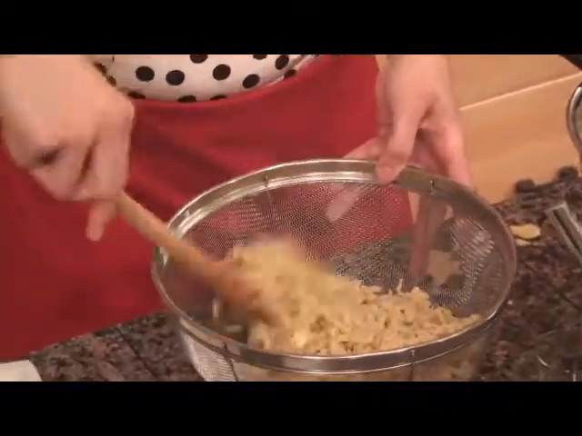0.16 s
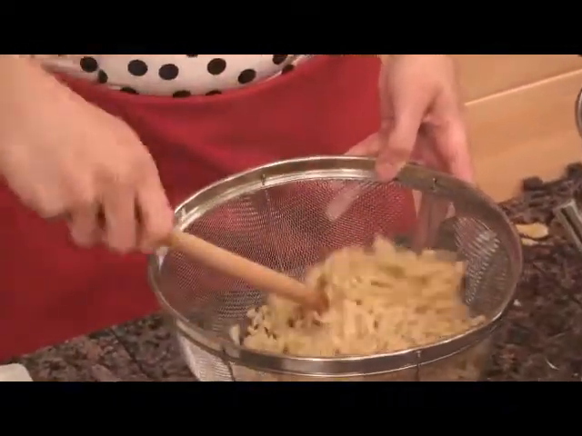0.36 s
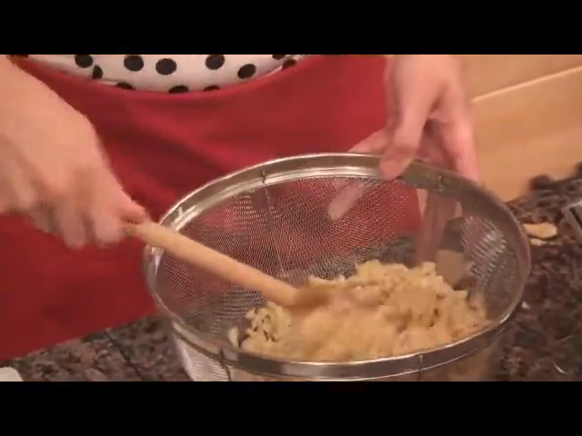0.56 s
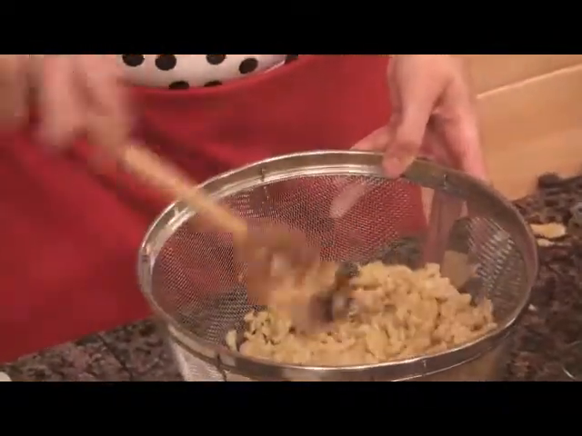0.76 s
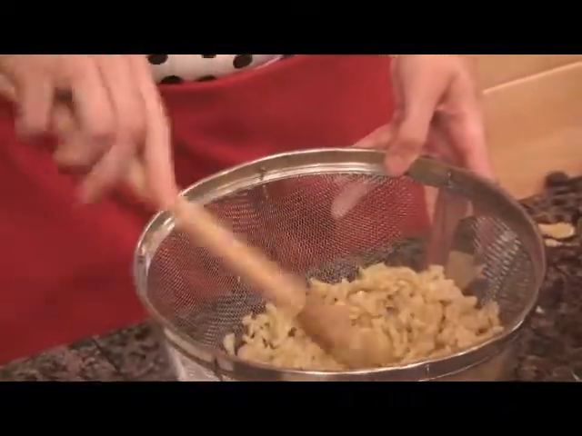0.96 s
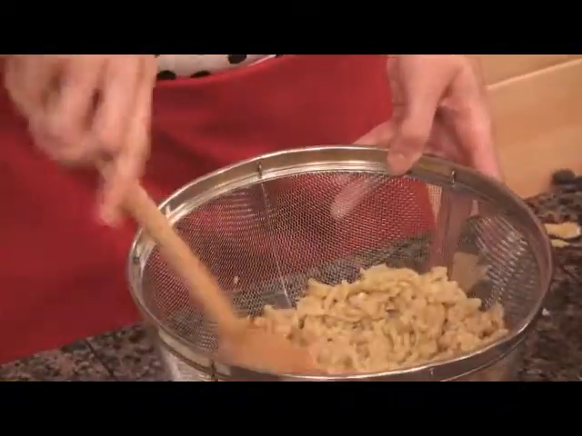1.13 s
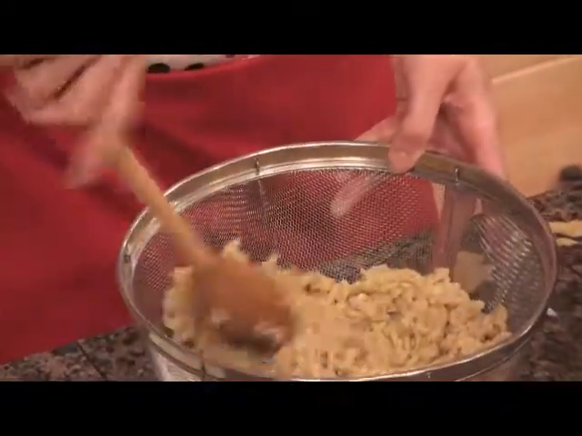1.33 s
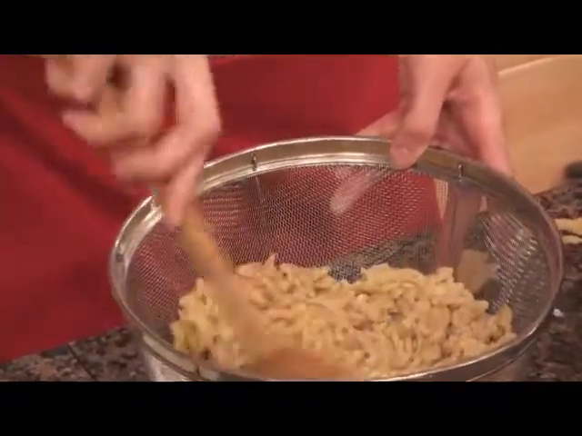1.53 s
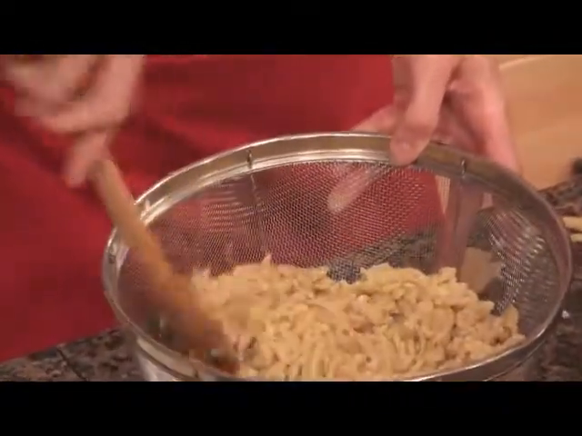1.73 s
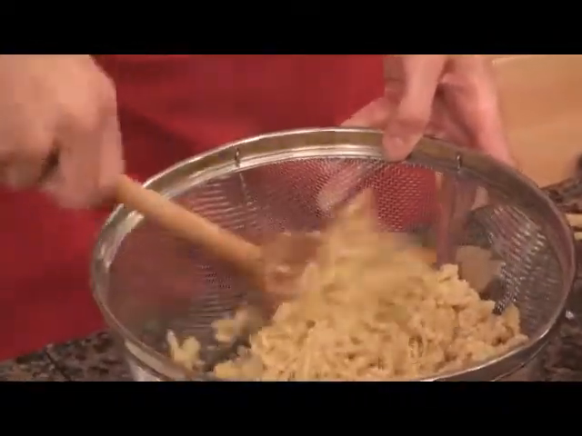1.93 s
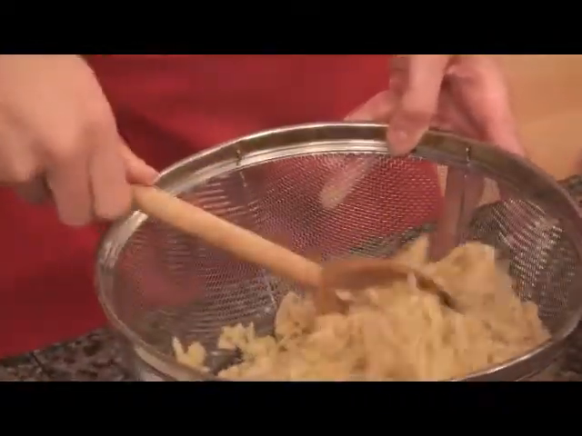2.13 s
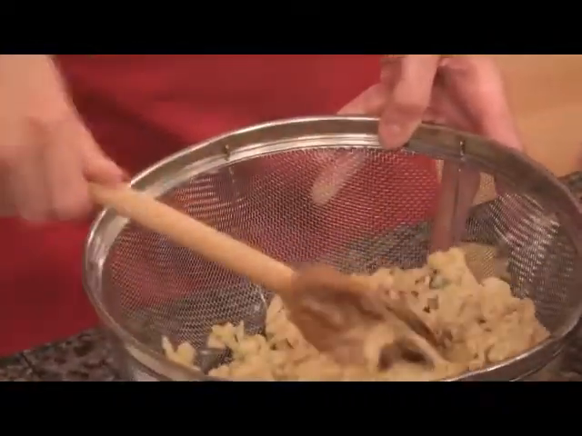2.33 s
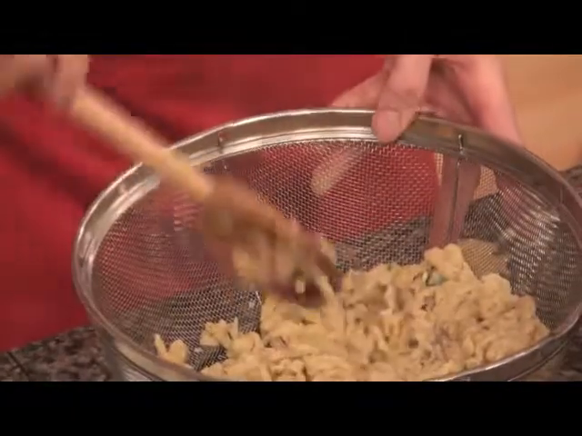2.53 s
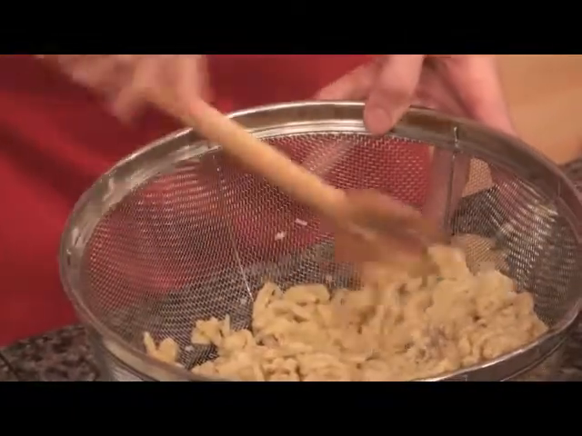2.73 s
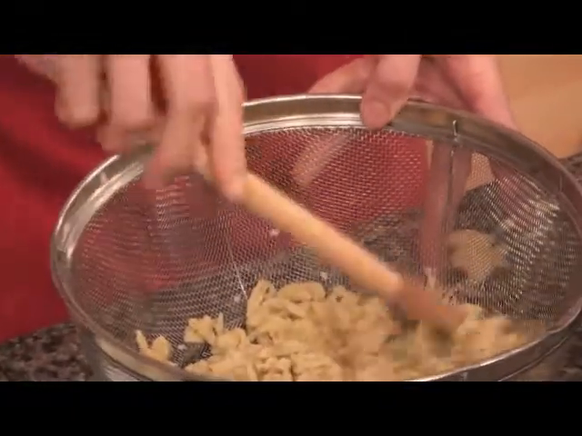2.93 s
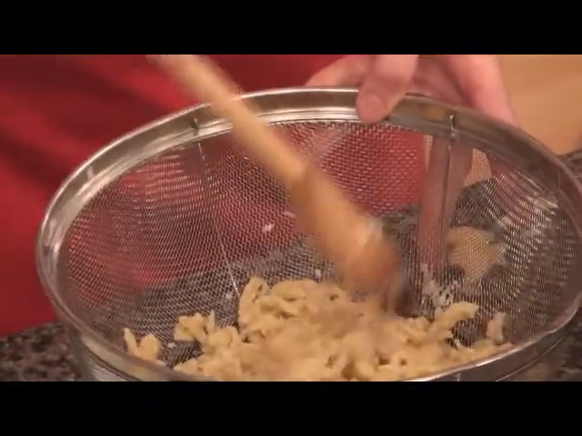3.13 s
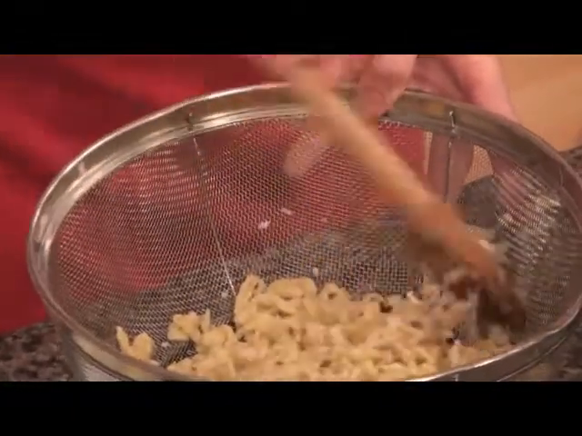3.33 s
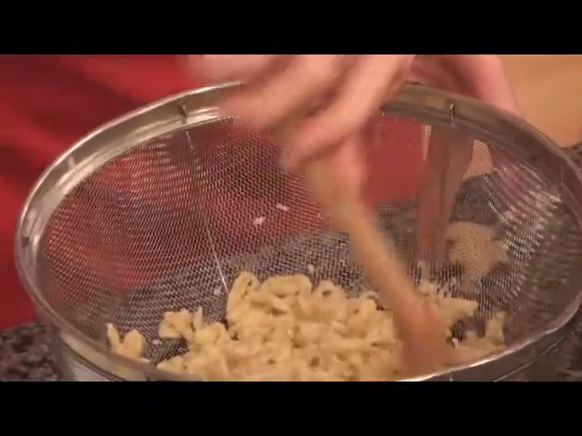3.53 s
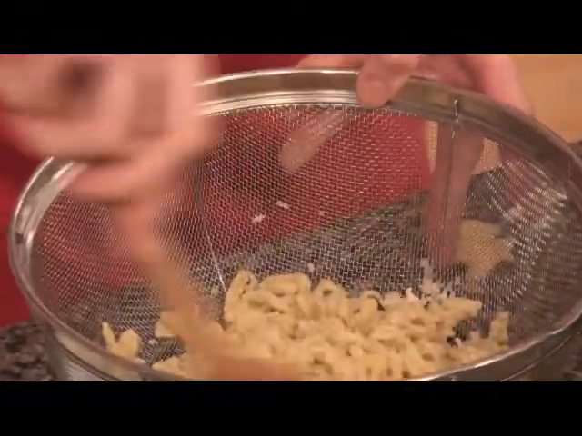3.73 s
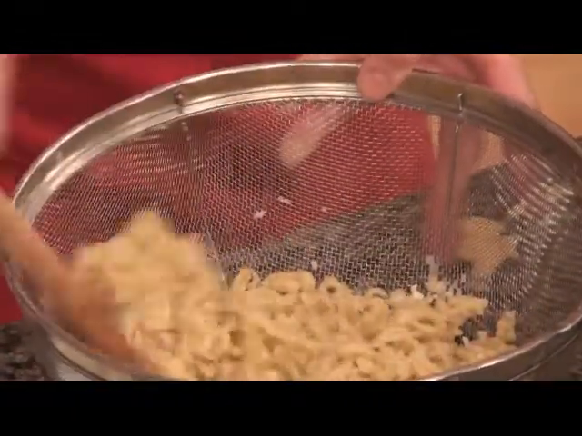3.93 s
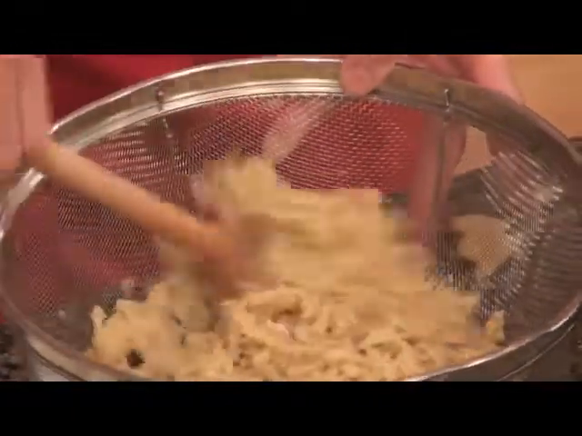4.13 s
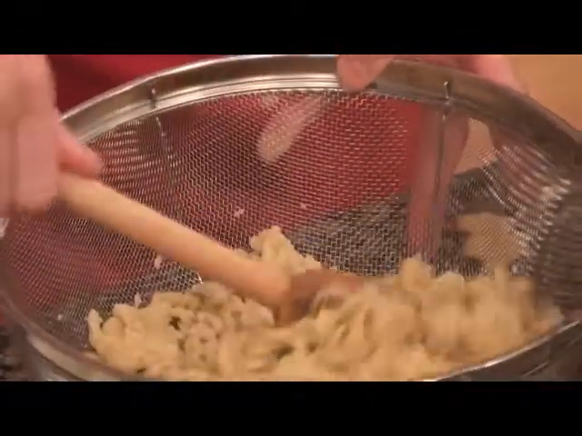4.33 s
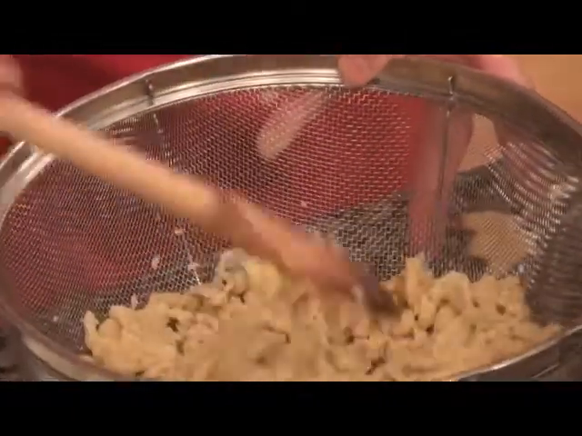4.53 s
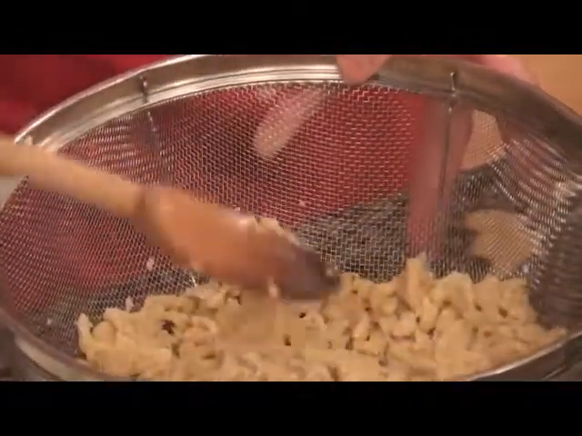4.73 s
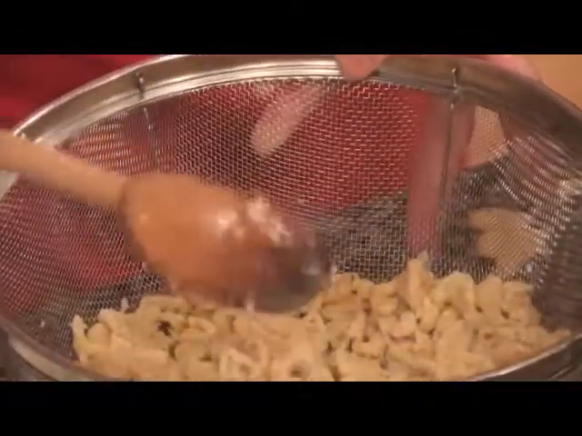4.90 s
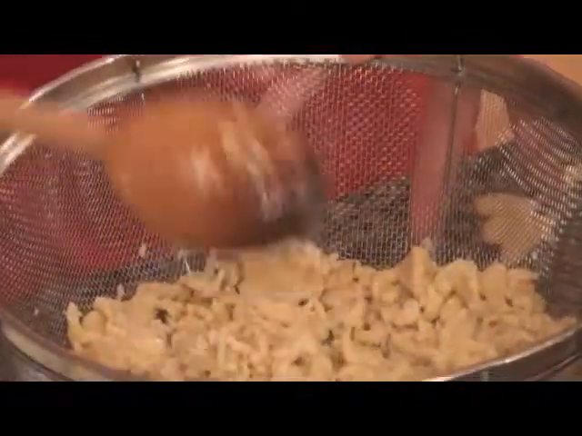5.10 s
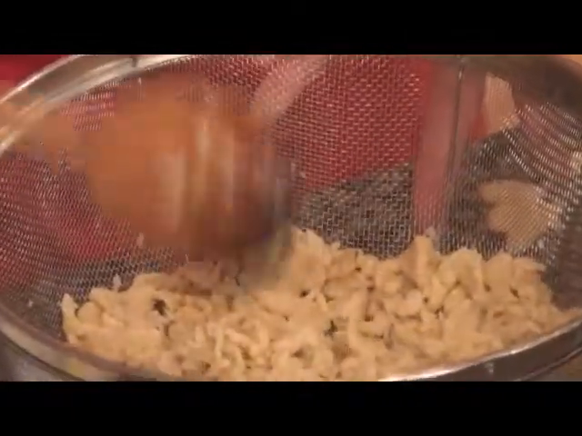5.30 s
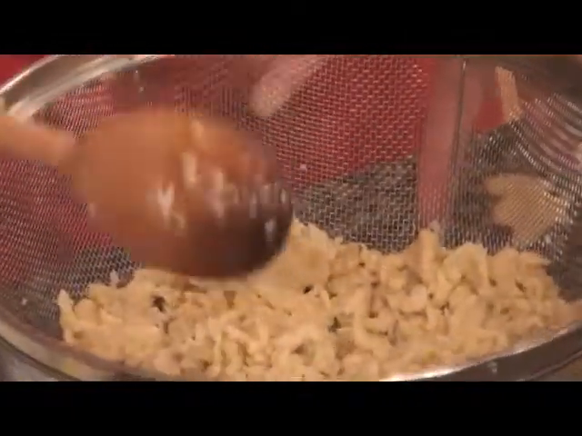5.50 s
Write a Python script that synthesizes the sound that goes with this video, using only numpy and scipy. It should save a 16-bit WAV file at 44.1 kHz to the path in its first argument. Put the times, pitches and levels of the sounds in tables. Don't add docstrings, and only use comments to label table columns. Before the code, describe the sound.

Close up in a hard-walled kitchen, a wooden spoon drags cooked noodles over a steel mesh strainer in short raspy bursts with bright ticks and soft food landings. Six spaced raps on the rim finish it. Faint fridge hum and very low paired thuds lie beneath; nearly mono.

```python
import sys
import numpy as np
from scipy import signal
from scipy.fft import rfft, irfft, next_fast_len
from scipy.io import wavfile
from scipy.ndimage import map_coordinates

SR = 44100
rng = np.random.default_rng(int(sys.argv[2]) if len(sys.argv) > 2 else 0)


def transcribe(signal):
    frames = np.atleast_2d(signal).T
    limited = np.clip(frames, -1, 1)
    pcm = np.round(limited * 32767).astype(np.int16)
    wavfile.write(sys.argv[1], SR, pcm)


def volts_from_db(level):
    exponent = np.asarray(level, float) / 20
    return 10 ** exponent


N = 249492


def unit(x):
    return x / np.sqrt(np.mean(x ** 2) + 1e-20)


def along(points, hz):
    f, v = np.transpose(points)
    return np.interp(np.log(hz + 1), np.log(f + 1), v)


def wobble(rate):
    knots = rng.standard_normal(int(N * rate / SR) + 4)
    return map_coordinates(knots, [np.arange(N) * rate / SR])


def filtered(x, response):
    m = next_fast_len(N + SR // 2)
    return irfft(rfft(x, m) * response(np.fft.rfftfreq(m, 1 / SR)), m)[..., :N]


def shaped_noise(spectrum):
    return unit(filtered(rng.standard_normal(N), lambda f: volts_from_db(along(spectrum, f)) * (f > 12)))


def body(modes):
    def response(f):
        total = 0
        for k, (centre, width, db) in enumerate(modes):
            damping = 1j * f * width
            total = total + (-1) ** k * volts_from_db(db) * damping / (centre ** 2 - f ** 2 + damping)
        return total
    return response


def struck(modes):
    def response(f):
        total = 0
        for k, (centre, width, db) in enumerate(modes):
            total = total - (-1) ** k * volts_from_db(db) * body([(centre, width, 0)])(f) ** 2
        return total
    return response


def peak(hz, q, x):
    return signal.lfilter(*signal.iirpeak(hz, q, SR), x)


# pitch_hz, density_db
AIR_TONE = [(20, -11), (60, -15), (110, -14), (200, -12), (400, -16), (700, -18.5), (1000, -22.5),
            (1500, -33), (1950, -20), (2400, -35.5), (4000, -35.5), (8000, -39.5), (12000, -41.5),
            (16000, -45)]


def kitchen_air():
    return volts_from_db(-46.5 + 0.8 * wobble(4)) * shaped_noise(AIR_TONE)


# pitch_hz, level_db, flutter_db
MOTOR_HUM = [(58.4, -56.5, 3), (120.7, -65, 3.5), (180.5, -63, 5), (240.3, -42, 1.5), (300, -50.5, 3),
             (381, -61, 3.5), (666, -61.5, 2.5)]


def fridge():
    t = np.arange(N) / SR
    hum = np.zeros(N)
    for hz, db, flutter_db in MOTOR_HUM:
        level = volts_from_db(db + 0.5 + flutter_db * wobble(25))
        phase = 0.086 * wobble(27) + 6 * rng.random()
        hum += level * np.sin(2 * np.pi * hz * t + phase)
    return hum


# start_s, level_db, pitch_hz, rise_s
PUSH_PAIR = [
    (.004, -39, 88, .017),
    (.278, -39.5, 60, .023),
]
# start_s, level_db, pitch_hz, rise_s
EXTRA_PUSH = (1, -47, 101, -3)


def thuds():
    beat_s, scatter_db = 0.632, 0.8
    out, t = np.zeros(N + SR), np.arange(SR // 6) / SR
    pushes = [(s + k * beat_s, *rest) for k in range(9) for s, *rest in PUSH_PAIR]
    for s, db, start_hz, rise_s in [*pushes, EXTRA_PUSH]:
        pitch_hz = 30 + (1.7 * start_hz - 30) * np.exp(-t / 0.02)
        swell = (t / rise_s) ** 2 * np.exp(2 - 2 * t / rise_s)
        level = volts_from_db(db + scatter_db * rng.standard_normal())
        push = level * swell * np.sin(2 * np.pi * np.cumsum(pitch_hz) / SR)
        out[round(s * SR):][:len(t)] += push
    return out[:N]


# delay_s, level_db
NEAR_ECHOES = [(.0032, -20), (.0065, -17), (0.0094, -30), (0.016, -12.5), (0.029, -13.5)]
# pitch_hz, t60_s
REVERB_TIME = [(200, 1), (530, 0.68), (1400, 0.7), (3700, 0.68), (9700, 0.53), (15000, 0.74)]


def room(x, delay_s=0.005):
    out, hop = np.zeros(N + 2 * SR), SR // 3
    for start in range(0, N, hop):
        hz, t, z = signal.stft(rng.standard_normal(SR * 3 // 4), SR, nperseg=256)
        decay = volts_from_db(-60 * t / along(REVERB_TIME, hz)[:, None])
        tail = signal.istft(z * decay, SR, nperseg=256)[1]
        tail = tail * np.clip(np.arange(len(tail)) / (delay_s * SR), 0, 1) ** 2
        answer = volts_from_db(0.5) * tail / np.linalg.norm(tail)
        for s, db in NEAR_ECHOES:
            answer[round(s * SR)] += volts_from_db(db)
        wet = signal.fftconvolve(x[start:start + hop], answer)
        out[start:start + len(wet)] += wet
    return out[:N]


# start_s, level_db, pitch_hz, t60_s
SHAKEN_MODES = [(.19, -41, 370, 0.22), (.41, -38, 2240, 0.33), (1.199, -36, 1300, 0.33),
                (1.17, -43.5, 2930, .6), (1.28, -38.5, 2900, 0.49), (.08, -40, 5500, 0.36),
                (.27, -41, 5600, 0.27), (1.33, -37.5, 370, 0.17), (1.8, -33, 668, 0.66),
                (1.8, -35, 370, 0.24), (2.054, -35.5, 353, 0.36), (2.901, -33, 290, 0.18),
                (3.53, -38, 930, 0.23)]


def landings():
    out, t = np.zeros(N + SR), np.arange(SR // 2) / SR
    for s, db, hz, t60 in SHAKEN_MODES:
        shake = unit(peak(hz, 9, rng.standard_normal(len(t))))
        envelope = volts_from_db(db - 60 * t / t60) * (1 - np.exp(-t / 0.0063))
        out[round(s * SR):][:len(t)] += envelope * shake
    return out[:N]


# start_s, level_db, pitch_hz, knock_db
GRITTY_CONTACTS = [(0.0375, -31, 2020, -3), (0.0954, -22, 5440, -8), (0.1386, -31, 2100, -1),
                   (0.288, -21, 2580, -13), (0.431, -23, 1920, -27), (1.105, -35, 1840, 1),
                   (1.132, -33, 3500, 1.5), (1.2124, -37, 2200, -9), (1.3417, -23.5, 2930, -4),
                   (1.714, -27.5, 2910, -7), (1.7597, -19.5, 6170, -3), (1.7837, -9.5, 3600, -12),
                   (1.7966, -15.5, 5950, -22), (1.963, -16.5, 1940, -27.5), (2.014, -18, 2430, -16),
                   (2.049, -20, 2064, -13), (2.761, -28.5, 1890, -5), (2.814, -40, 2610, -8),
                   (2.894, -22, 2080, -10), (3.502, -18.5, 4330, -7), (3.5287, -12, 2830, -12.5),
                   (3.7239, -29, 2900, -9), (3.891, -23, 5000, -7), (3.903, -16.5, 3840, -24),
                   (4.03, -24, 4300, -15), (4.196, -17.5, 2060, -13)]
# start_s,
# level_db, pitch_hz, knock_db
SHARP_SNAPS = [(0.079, -23, 5540, -17), (0.19, -21.5, 2680, -4), (0.216, -24, 2850, -2),
               (0.2735, -15, 2600, -12), (0.53, -29, 2510, -13), (1.4464, -39.5, 2770, -11),
               (1.5197, -33, 2750, -16), (2.132, -10.5, 4140, -21), (3.0674, -21, 4400, -13),
               (3.426, -23, 4280, -7), (3.7956, -27, 3230, -24), (3.835, -20, 2620, -13),
               (3.9526, -18, 2690, -13), (3.9727, -12.5, 2980, -14), (4.1728, -12, 2650, -11),
               (4.311, -22.5, 3600, -2.5), (0.687, -44, 8000, -20), (2.342, -35, 7000, -16),
               (3.305, -42, 6500, -25), (4.47, -31.5, 4500, -20), (4.54, -37, 7000, -18),
               (4.575, -34, 3440, -20)]


def ticks():
    out, t = np.zeros(N + SR), np.arange(SR // 12) / SR
    for contacts, swell_s in [(GRITTY_CONTACTS, 0.0028), (SHARP_SNAPS, 0.0011)]:
        swell = t / swell_s * np.exp(1 - t / swell_s)
        for s, db, hz, knock_db in contacts:
            mesh_grit, spoon_grit = rng.standard_normal((2, len(t))) * swell
            ring = 2.3 * peak(hz, 2.2, mesh_grit)
            sizzle = 0.48 * peak(7500, 0.9, mesh_grit)
            knock = volts_from_db(knock_db + 16) * peak(1100, 1.5, spoon_grit)
            out[round(s * SR):][:len(t)] += volts_from_db(db - 13.0) * (ring + sizzle + knock)
    return out[:N]


def chatter(rate, spread_db, smooth):
    size_db = spread_db * np.minimum(rng.exponential(size=N), 3.5)
    clicks = (rng.random(N) < rate / SR) * volts_from_db(size_db) * rng.choice([-1, 1], N)
    return unit(clicks) + smooth * rng.standard_normal(N)


# pitch_hz, width_hz, level_db
SPOON_BELLY = [(1052, 120, -1.5), (1300, 370, -1), (1640, 360, -0.5)]
# pitch_hz, width_hz, level_db
SPOON_LIP = [(2080, 330, -2.5), (2620, 200, -3), (2900, 330, -4)]
# pitch_hz, width_hz, level_db
STRAINER_BOWL = [(370, 119, 5), (668, 69, 2), (832, 680, 0)]
# pitch_hz, width_hz, level_db
MESH_WIRES = [(3890, 960, 9), (6080, 750, 8.5), (6870, 2500, 3.5)]
# pitch_hz, width_hz, level_db
WIRE_FIZZ = [(8800, 1700, 7), (11930, 5100, 5.5), (13600, 5400, 4.5)]
# start_s, hold_s, rasp_db, brightness_db, lip_over_belly_db
SPOON_DRAGS = [(0.0, 0.1, -39.5, 2.5, 1.5), (0.143, .06, -35, 0.6, 1.5), (0.283, 0.02, -36, 3, 1.5),
               (0.407, .015, -35.5, -0.5, 0.5), (1.134, .04, -41.5, -2, -3), (1.2, 0.076, -37, -2.5, 0),
               (1.273, 0.029, -34.5, 0.7, 1), (1.746, .015, -35, 3.5, 0), (1.774, 0.015, -27, 5, -.6),
               (1.88, 0.085, -38, 2, 1.5), (1.997, 0.046, -38, 4.5, -4), (2.051, 0.014, -37, 4, -1),
               (2.143, 0.047, -41.5, 6.5, 3.5), (2.813, .02, -37.5, 2, -1), (2.915, 0.026, -38, 1.5, -0.5),
               (3.506, 0.057, -41.5, 8, 3), (3.61, 0.1, -41, -2, 1.5), (3.721, .03, -40.5, 5.5, -.6),
               (3.77, 0.089, -40.5, 2.1, 2.2), (3.896, .02, -37, -2.5, 1.8), (3.96, 0.053, -39, 0, 2.5),
               (4.022, 0.049, -40.5, 4.5, 2.2), (4.176, 0.03, -35.5, 2.5, 1.5),
               (4.254, 0.075, -41.5, 4, 0.5)]
LIFT_FADE = [169, 146, 132, 171, 190]
PART_LEVEL = [-2.5, -3, -6.5, -5, -16.5]
CREEP_LEVEL = [-58, -60, -58, -66, -68]


def strokes():
    press_db_per_s, settled_s = 694, 4.8
    tumble_db, tumble_db_per_s = -11.5, 63
    clump_db = 2.4
    start, hold, rasp_db, bright_db, lip_db = np.transpose(SPOON_DRAGS)[:, :, None]
    t = np.arange(N) / SR
    early, late = np.maximum(start - t, 0), np.maximum(t - start - hold, 0)
    bumps = volts_from_db(1.6 * wobble(30) + 1.6 * wobble(90))
    colours = [-lip_db, lip_db, 0.35 * bright_db, bright_db, 1.73 * bright_db]
    out = 0
    for k, modes in enumerate([SPOON_BELLY, SPOON_LIP, STRAINER_BOWL, MESH_WIRES, WIRE_FIZZ]):
        fade_db = np.maximum(-LIFT_FADE[k] * late, tumble_db - tumble_db_per_s * late)
        peak_db = rasp_db + colours[k] + PART_LEVEL[k]
        drag_db = (peak_db - press_db_per_s * early + fade_db).max(axis=0)
        level = np.hypot(volts_from_db(drag_db), volts_from_db(CREEP_LEVEL[k]) * (t < settled_s))
        centre = np.mean(modes, 0)[0]
        skirt = body([(centre, 0.63 * centre, 0)])
        jolts = bumps * volts_from_db(clump_db * wobble(45)) * chatter(900, spread_db=4.5, smooth=0.62)
        ringing = filtered(jolts, lambda f: body(modes)(f) * skirt(f))
        out = out + level * volts_from_db(-3.5) * unit(ringing)
    return out


def moved(modes, lift_db=0):
    detune, scatter_db = 0.012, 1.2
    out = []
    for k, (centre, width, db) in enumerate(modes):
        a, b = rng.standard_normal(2)
        out.append((centre * (1 + detune * a), width, db + scatter_db * b + lift_db * (k - 0.5)))
    return out


# start_s, level_db, spoon_db, rim_treble_db, counter_thud_db
RIM_RAPS = [
    (4.813, -14.5, 3, -1.5, 5.5),
    (4.967, -4.5, -0.5, 3, -2),
    (5.117, -8, -1, 1, 0.5),
    (5.283, -3.5, -0.5, -1, -1.5),
    (5.447, -3.5, 0, 1.5, -3),
    (5.608, -1.5, -0.5, 2, -3),
]
# pitch_hz, width_hz, level_db
SPOON_WOOD = [(1335, 560, -2), (2816, 370, 1.5)]
# pitch_hz, width_hz, level_db
STEEL_RIM = [(4200, 520, -4.5), (5040, 440, -2), (5950, 330, -11), (6990, 400, -13)]
# pitch_hz, width_hz, level_db
COUNTER_STAND = [(171, 78, -14.5), (290, 80, -13), (545, 110, -17)]
# pitch_hz, density_db
RAP_TO_WALLS = [(410, -52), (700, -10), (1270, -1), (2310, -5.5), (2870, 0.5), (3450, -10.5), (3870, -3),
                (4470, -8.5), (5020, -2.5), (5940, -5.5), (6590, -8.5), (9980, -14), (15500, -25.5)]


def raps():
    to_tip_db_per_s = 6
    wood, steel, thud, jangle, tones = np.zeros((5, N))
    t = np.arange(SR // 30) / SR
    fade = volts_from_db(-60 * t / 0.042) * (1 - np.exp(-t / 0.00044))
    middle_s = np.mean(RIM_RAPS, 0)[0]
    for s, db, wood_db, steel_db, thud_db in RIM_RAPS:
        i = round((s + 0.00032) * SR)
        wood[i] = volts_from_db(db + wood_db + 25)
        steel[i + round(0.0005 * SR)] = volts_from_db(db + steel_db + 23.5)
        steel[i - round(0.003 * SR)] = volts_from_db(db - 8)
        thud[i] = volts_from_db(db + thud_db + 32.0)
        jangle[i:i + len(t)] = volts_from_db(db + steel_db - 13.0) * fade * rng.standard_normal(len(t))
        here = np.abs(np.arange(N) - i) < SR // 20
        spoon_modes = moved(SPOON_WOOD, to_tip_db_per_s * (s - middle_s))
        tones = tones + filtered(wood * here, struck(spoon_modes))
        tones = tones + filtered(steel * here, struck(moved(STEEL_RIM)))
    counter = filtered(thud, body(COUNTER_STAND))
    loose_wires = filtered(jangle, body([(7700, 4400, 0)]))
    low = filtered(wood, lambda f: volts_from_db(along(RAP_TO_WALLS, f) - 5.5) * (f < 3450))
    high = filtered(steel, lambda f: volts_from_db(along(RAP_TO_WALLS, f) - 4.5) * (f >= 3450))
    return tones + counter + loose_wires, low + high + volts_from_db(-2.5) * counter


def scene():
    background = kitchen_air() + fridge() + thuds()
    hands = landings() + ticks() + strokes()
    rim, rim_to_walls = raps()
    mono = background + hands + rim + room(volts_from_db(-5.0) * hands + rim_to_walls)
    return np.array([mono, mono])


# pitch_hz, density_db
INPUT_HISS = [(20, 20.5), (60, 17), (200, -2.5), (500, -2), (2000, -8.5), (4000, -4), (10000, -7),
              (15000, -5.5)]


def channel_hiss():
    return volts_from_db(-66) * shaped_noise(INPUT_HISS)


def band_limit(x):
    return signal.sosfilt(signal.butter(12, 16630, fs=SR, output="sos"), x)


def record(dry):
    squashed = dry / (1 + np.abs(dry / 0.85) ** 4) ** (1 / 4)
    faint_copy = volts_from_db(-43) * np.roll(squashed[0], round(0.0004 * SR))
    side = channel_hiss() + faint_copy
    limited = filtered(squashed + [side, -side], lambda f: np.where(f < 15750, 1, volts_from_db(-38)))
    return band_limit(limited)


dry = scene()
out = record(dry)
transcribe(out)
```